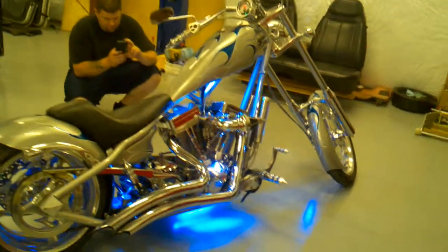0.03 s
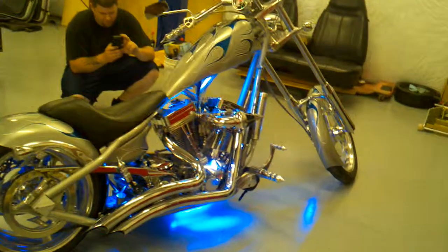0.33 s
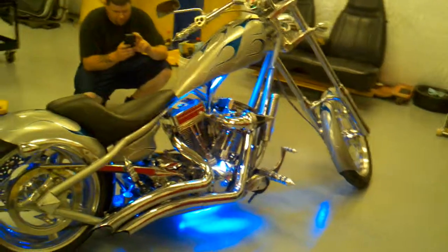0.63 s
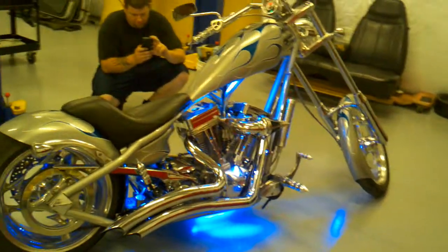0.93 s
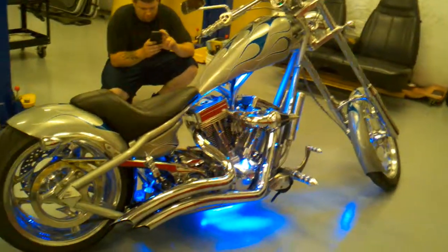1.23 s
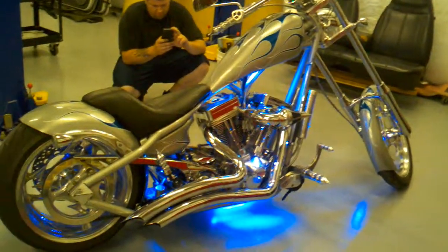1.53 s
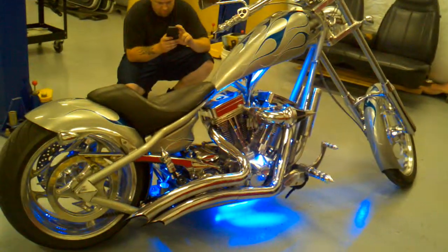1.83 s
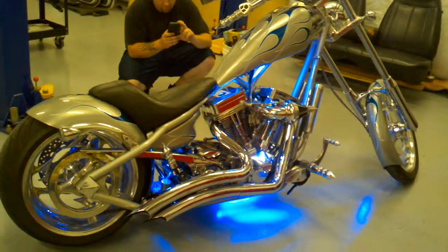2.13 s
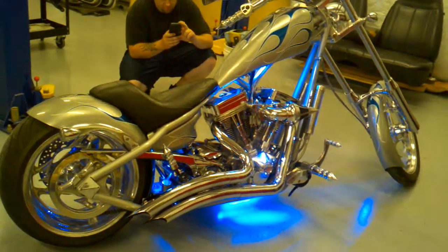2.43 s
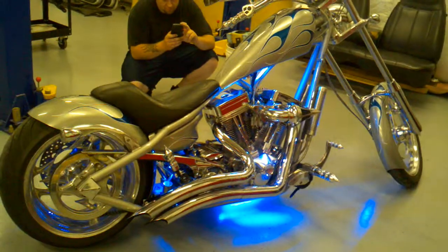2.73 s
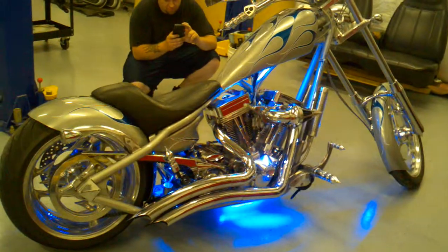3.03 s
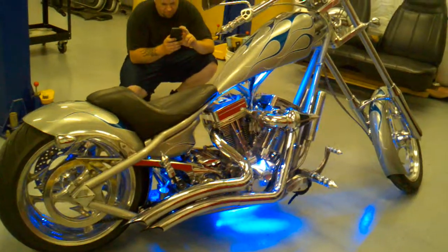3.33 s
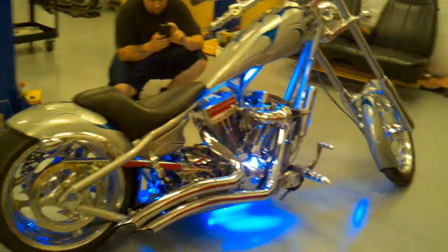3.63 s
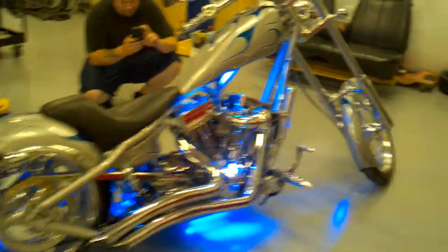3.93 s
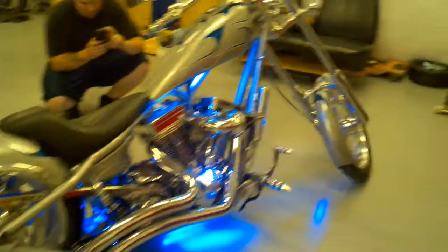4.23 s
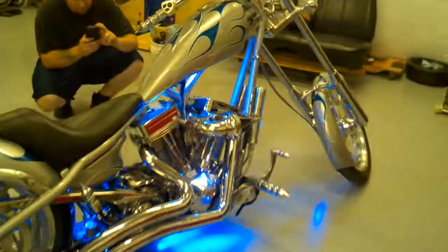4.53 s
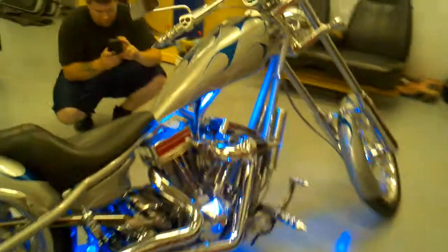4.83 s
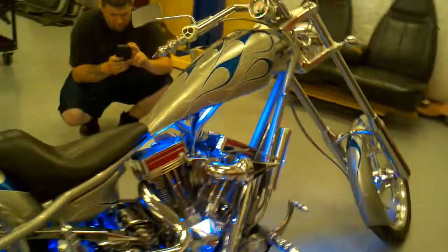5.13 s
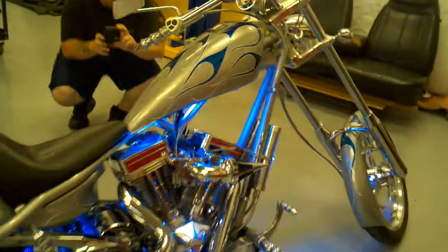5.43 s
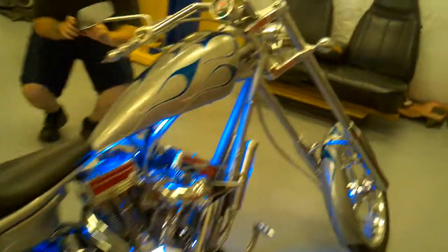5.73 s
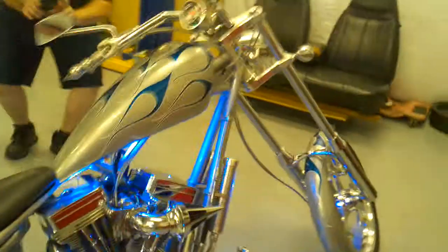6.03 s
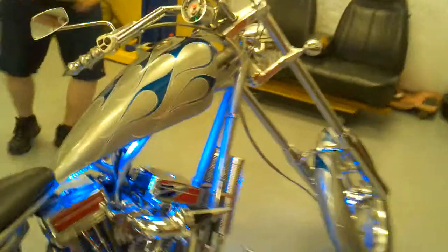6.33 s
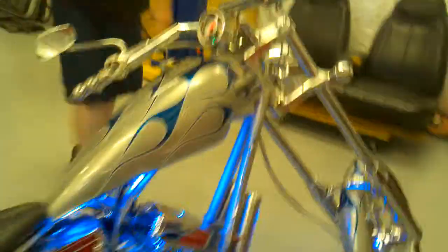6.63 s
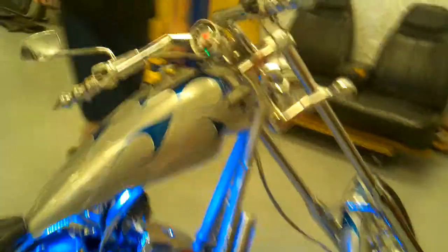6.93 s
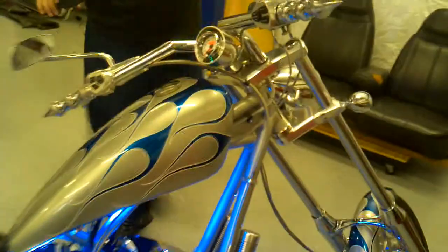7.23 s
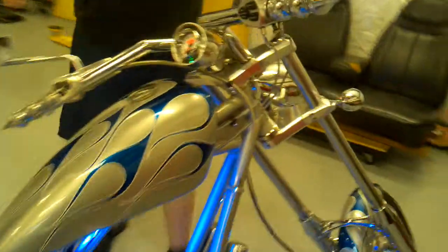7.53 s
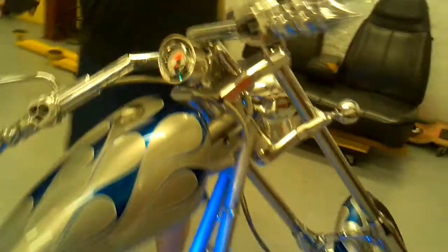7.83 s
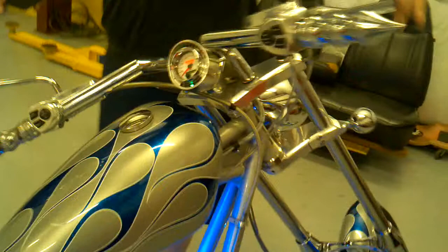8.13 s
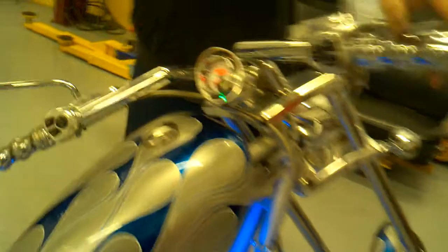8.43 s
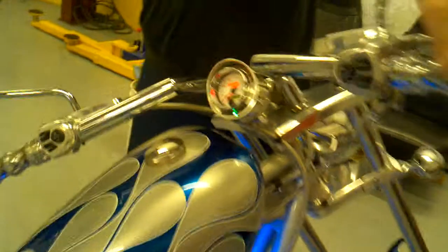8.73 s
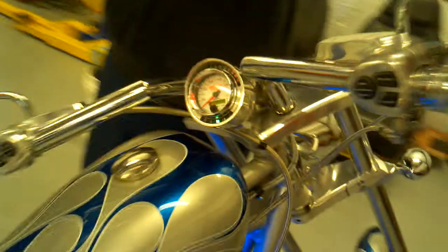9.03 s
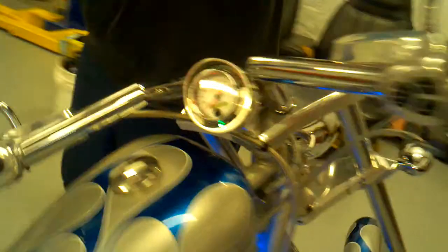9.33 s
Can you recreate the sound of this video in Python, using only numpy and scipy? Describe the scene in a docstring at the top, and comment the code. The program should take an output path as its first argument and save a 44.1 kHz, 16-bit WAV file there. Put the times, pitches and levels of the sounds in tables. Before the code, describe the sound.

A big motorcycle engine idles with uneven, loping exhaust pops and light metallic clatter in an echoing workshop.

```python
"""In a hard-walled workshop, a big V-twin motorcycle idles unevenly through short open pipes.
It pops one to three times in a row, then coasts and slows through weak, hissing strokes.
Each firing is a kick of pressure, a low thump and a rasping jet of gas that sometimes whistles;
a second thud follows about half a beat later. Metal rattles, the engine rumbles, the walls echo.
Two close microphones with stereo widening move from beside the pipes up to the fuel tank."""
import sys
import numpy as np
from scipy import signal
from scipy.fft import rfft, irfft, next_fast_len
from scipy.io import wavfile
from scipy.ndimage import map_coordinates

SR = 44100
rng = np.random.default_rng(int(sys.argv[2]) if len(sys.argv) > 2 else 0)


def generate_wav(signal):
    """Clip the signal to [-1, 1] and save it as 16-bit WAV at the path in sys.argv[1]."""
    frames = np.transpose(np.atleast_2d(signal))
    scaled = np.clip(frames, -1, 1) * 32767
    pcm = np.round(scaled).astype(np.int16)
    wavfile.write(sys.argv[1], SR, pcm)


N = 418950  # 9.5 seconds

# Strokes that fire fully and pop: t/s, pulse level/dB, rasp level/dB, hiss level/dB
LOUD_POPS = [(0.0292, -25.5, -15, -25), (0.122, -25.5, -12, -21), (0.3798, -27, -23.5, -27),
             (0.4635, -23.5, -14.5, -25.5), (0.6827, -28.5, -13, -26), (0.78, -29.5, -12.5, -21.5),
             (0.9688, -30.5, -15.5, -29), (1.045, -26.5, -14, -25.5), (1.1226, -27, -14, -24),
             (1.3711, -29, -20, -30.5), (1.454, -24, -13, -26), (1.8099, -27, -20, -33.5),
             (1.8715, -21.5, -11.5, -21.5), (2.088, -30, -21.5, -31.5), (2.2744, -29, -20, -32),
             (2.339, -22.5, -12.5, -24.5), (2.5693, -30.5, -16.5, -24), (2.6428, -29.5, -14, -24.5),
             (2.734, -34.5, -28, -39), (2.9228, -30.5, -21.5, -34), (3.09, -29.5, -14, -30),
             (3.1595, -27.5, -17.5, -27.5), (3.4423, -27, -14.5, -24.5), (3.5149, -28.5, -10.5, -22),
             (3.6973, -33.5, -19.5, -28.5), (3.7957, -26, -13, -26.5), (4.0486, -28, -26, -27.5),
             (4.1324, -23, -16, -22.5), (4.4877, -27, -18, -26.5), (4.5499, -23.5, -11.5, -23),
             (4.778, -29, -15, -24), (5.0349, -27, -26, -30.5), (5.1143, -24, -13, -23),
             (5.3385, -27.5, -9.5, -27.5), (5.438, -27, -14, -29), (5.6903, -26.5, -18.5, -34),
             (5.774, -20.5, -11, -28.5), (5.9967, -26.5, -10, -32), (6.0938, -26.5, -9.5, -27.5),
             (6.3661, -26.5, -19, -31.5), (6.4495, -21, -9, -24.5), (6.797, -27, -12.5, -34),
             (6.8606, -22.5, -9, -30), (7.0816, -28.5, -9.5, -32), (7.263, -29, -15, -40),
             (7.339, -24, -11, -31), (7.415, -25, -10.5, -25), (7.8004, -28, -24, -37),
             (7.8663, -20, -10, -21.5), (8.0994, -26, -15, -27.5), (8.3603, -25, -23, -34.5),
             (8.4412, -20, -17, -22.5), (8.7873, -26.5, -18.5, -34.5), (8.8489, -20.5, -12.5, -27.5),
             (9.0695, -25.5, -16, -30), (9.2418, -28.5, -19, -34), (9.307, -21, -15, -27.5)]
# Weak strokes while the engine coasts, each a short tick: t/s, hiss level/dB
COASTING_STROKES = [(0.191, -26.5), (0.295, -37), (0.525, -28), (0.611, -31), (1.192, -28.5), (1.291, -37),
                    (1.519, -26.5), (1.606, -29.5), (1.685, -33.5), (1.948, -35.5), (2.004, -27.5),
                    (2.167, -32.5), (2.42, -34.0), (2.478, -30.5), (2.814, -31), (3.247, -31.5),
                    (3.323, -28.5), (3.866, -30), (4.194, -27.5), (4.287, -33), (4.367, -31.5), (4.69, -32),
                    (5.265, -31), (5.513, -35.5), (5.612, -36), (5.837, -31.5), (5.929, -36.5),
                    (6.171, -39), (6.513, -34.5), (6.597, -38), (6.995, -33.5), (7.167, -41),
                    (7.481, -34.5), (7.579, -39.5), (7.943, -37.5), (8.01, -34.5), (8.278, -43),
                    (8.511, -35), (8.925, -38), (8.99, -34.5), (9.385, -36), (9.453, -38)]
WEAK_PULSE_DB, WEAK_RASP_DB, RASP_PER_HISS = -40, -17, 0.48

def firings():
    """Every stroke of the engine, loud or weak, in order: its time and its pulse, rasp and hiss levels."""
    weak = [(s, WEAK_PULSE_DB, WEAK_RASP_DB + RASP_PER_HISS * db, db) for s, db in COASTING_STROKES]
    return np.array(sorted([tuple(row) for row in LOUD_POPS] + weak)).T


# Tone of the pressure pulse, beside the pipes and over the tank: f/Hz, level/dB
PULSE_AT_PIPES = [(30, -62), (65, -18), (110, 4.5), (185, -6.5), (230, 3), (330, -2), (410, -4), (490, 3.5),
                  (620, -19), (850, -8.5), (1050, -3), (1400, -17), (2500, -29.5)]
PULSE_AT_TANK = [(44, -53), (65, -18.5), (105, 0), (180, -9.5), (240, -5.5), (360, 2), (440, -7.5),
                 (550, -1), (740, -4), (880, -16.5), (1100, -11), (1400, -12), (2500, -32)]
# Tone of the rasping gas at the same two spots: f/Hz, level/dB
RASP_AT_PIPES = [(400, -39.5), (1000, -6), (1350, -5), (1800, 6), (2300, -1.5), (3000, 2.5), (3600, 3),
                 (4300, -5), (7000, -18)]
RASP_AT_TANK = [(500, -16.5), (1050, -3.5), (1500, -17.5), (2100, 2), (2900, 4.5), (3500, -1.5),
                (4300, -18), (7000, -28)]
# Tone of the high hiss at the same two spots: f/Hz, level/dB
HISS_AT_PIPES = [(4000, -42.5), (5400, -3), (6400, 0), (7700, 1), (9200, -1), (10500, -14), (13800, -33)]
HISS_AT_TANK = [(3500, -1.5), (5400, 4), (7700, 0.5), (10500, -2.5), (13800, -10)]

def exhaust(over_tank):
    """A pressure pulse leaves the pipe just ahead of the gas. Rows: left, right, sound for the walls."""
    times, pulse_db, rasp_db, hiss_db = firings()
    pulses = scatter(times - .005, amp(pulse_db)[:, None] * pressure_waves(len(times)))
    rasp = amp(-4.0) * gas_jet(times, rasp_db, rise_s=0.0021, fall_s=0.0024, apart=1.77, linger=0.23)
    hiss = amp(2.0) * gas_jet(times, hiss_db, rise_s=0.0026, fall_s=0.0029, apart=1.0, linger=0.56)
    return (heard_from(over_tank, pulses, PULSE_AT_PIPES, PULSE_AT_TANK)
            + heard_from(over_tank, rasp, RASP_AT_PIPES, RASP_AT_TANK)
            + heard_from(over_tank, with_bounce(hiss), HISS_AT_PIPES, HISS_AT_TANK))


def pressure_waves(count, round_trip_s=0.002088, reflected=0.61):
    """A sharp wave bounces between valve and pipe end, faster in hotter gas, and leaves churning air."""
    t = event_time()
    trip = round_trip_s * np.exp(rng.normal(0, 0.14, (count, 1)))
    fronts = -sum((-reflected) ** k * np.exp(-((t - k * trip) / 0.000095) ** 2) for k in range(4))
    churn = (t > 0) * np.exp(-np.abs(t) / 0.012) * rng.standard_normal((count, len(t)))
    return amp(3.0) * fronts + amp(-5.5) * churn


def gas_jet(times, level_db, rise_s, fall_s, apart, linger):
    """Swirling gas bursts out as the valve opens; weak firings blow longer. Rows: left, right, walls."""
    t = event_time()
    stretch = np.exp(rng.normal(0, 0.41, (len(times), 1)))
    stretch *= amp(-linger * (level_db[:, None] - level_db.max()))
    width = np.where(t < 0, rise_s, fall_s * stretch)
    swell = amp(level_db)[:, None] * np.exp(-np.abs(t / width) ** 1.6)
    # the walls get one clean crack with the same energy and brightness as the burst
    crack = scatter(times, np.linalg.norm(swell, axis=1, keepdims=True))
    brighten = (np.sqrt(1 + 2 * apart ** 2) - 1) / 2
    to_walls = crack + brighten * np.diff(crack, prepend=0)
    return np.vstack([scatter(times, swell) * air_noise(apart), to_walls])


# Throaty blats on the hardest pops: t/s, middle f/Hz, level/dB
THROATY_BLATS = [(4.5495, 970, -21), (5.114, 1050, -28), (5.338, 1100, -23), (6.449, 1010, -25),
                 (6.8585, 790, -29), (7.414, 960, -29), (7.8648, 800, -15.5), (8.847, 950, -20.5),
                 (9.306, 1030, -16)]

def blats(width_s=0.0032, sweep_s=0.0052):
    """As hot gas fills the pipe, the pressure swings crowd together and the pitch shoots up."""
    times, hz, db = np.transpose(THROATY_BLATS)
    t = event_time()
    phase = 2 * np.pi * hz[:, None] * sweep_s * np.expm1(t / sweep_s)
    return scatter(times, swells(db, t, width_s) * np.cos(phase))


# Pops whose whistle stands out as a bark: t/s, f/Hz, level/dB
WHISTLING_BARKS = [(.122, 3160, -21), (.78, 3150, -17), (1.454, 1840, -13), (2.339, 2230, -13),
                   (2.644, 2210, -18), (3.515, 3410, -16.5), (4.05, 2190, -17.5), (4.55, 2260, -23),
                   (4.55, 2870, -14), (4.778, 2347, -15), (5.114, 3400, -14), (5.339, 2400, -33),
                   (5.438, 3320, -13.5), (5.774, 2180, -17), (6.095, 2340, -7.5), (6.861, 2480, -20),
                   (7.339, 3050, -8), (7.867, 3370, -17), (8.1, 1940, -9.5), (8.849, 3170, -11)]

def barks(width_s):
    """For a moment the jet locks on to one note of the pipe's lip; the shorter, the more like a clank."""
    times, hz, db = np.transpose(WHISTLING_BARKS)
    t = event_time()
    return scatter(times, swells(db, t, width_s) * np.sin(2 * np.pi * hz[:, None] * t))


# Strong thuds about half a crank turn after a stroke, probably the intake gulping: t/s, level/dB
STRONG_THUDS = [(0.079, -25), (0.732, -24), (1.084, -27), (1.169, -31), (1.238, -33), (1.416, -26.5),
                (1.494, -30), (1.907, -22.5), (2.377, -25), (2.783, -30), (2.972, -30), (3.042, -25),
                (3.201, -29.5), (3.559, -28.5), (3.75, -28), (3.845, -34), (4.585, -23.5), (5.391, -27),
                (5.481, -26.5), (6.047, -26.5), (6.894, -24), (7.378, -29), (7.454, -28), (7.517, -34),
                (7.904, -26.5), (8.481, -36), (8.887, -22), (9.116, -27), (9.193, -31.0), (9.345, -23),
                (9.426, -30.5)]
THUD_AT_PIPES_HZ, THUD_AT_TANK_HZ = 120.6, 103.8

def thuds(over_tank, width_s=0.0092, thump_delay_s=0.0019, soft_delay_s=0.043):
    """Short, round swings of air: a thump with every stroke, then a strong or soft thud before the next."""
    strokes, pulse_db, _, _ = firings()
    strong, strong_db = np.transpose(STRONG_THUDS)
    soft = np.flatnonzero(np.diff(np.searchsorted(strong, strokes)) == 0)  # no strong thud follows these
    soft_db = np.where(pulse_db[soft] > WEAK_PULSE_DB, -32, -38)  # louder after a pop
    times = np.r_[strokes + thump_delay_s, strong, strokes[soft] + soft_delay_s]
    db = np.r_[pulse_db - 7.5, strong_db, soft_db]
    place = np.interp(times, np.arange(N) / SR, over_tank)
    hz = THUD_AT_PIPES_HZ * (1 - place) + THUD_AT_TANK_HZ * place
    hz *= np.exp(0.027 * rng.standard_normal(len(times)))
    t = event_time()
    phase = 2 * np.pi * hz[:, None] * t
    swing = np.cos(phase) + amp(-11) * np.sin(2 * phase)
    return scatter(times, swells(db, t, width_s) * swing)


# Short low hums near 250 Hz that swell between some strokes: t/s, level/dB
LOW_HUMS = [(0.15, -37), (1.681, -35), (3.841, -41.5), (4.15, -35.5), (5.149, -40), (6.54, -33.5),
            (8.48, -36)]

def low_hum(pitch_hz=247.4, width_s=0.043):
    """A short low hum swells and fades, at a slightly different pitch each time."""
    times, db = np.transpose(LOW_HUMS)
    hz = pitch_hz * np.exp(0.027 * rng.standard_normal((len(times), 1)))
    t = event_time(size=8000)
    return scatter(times, swells(db, t, width_s) * np.sin(2 * np.pi * hz * t))


def clatter(level_db=-41, spread_db=4, pitch_hz=1550, ring_s=0.002, stray_knocks=400):
    """Valve gear and chain knock at random and twice at every stroke, each knock with its own pitch."""
    times = np.r_[rng.uniform(0, N / SR, stray_knocks), np.repeat(firings()[0], 2)]
    detune, strength = rng.standard_normal((len(times), 2)).T[:, :, None]
    t = np.maximum(event_time(size=600), 0)
    knocks = np.exp(-t / ring_s) * np.sin(2 * np.pi * pitch_hz * np.exp(.5 * detune) * t)
    return scatter(times, amp(level_db + spread_db * strength) * knocks)


# Tone of the engine's steady rumble: f/Hz, level/dB
RUMBLE_TONE = [(40, -51), (70, -8), (103, 4.5), (175, -21.5), (260, -3.5), (420, -3.5), (1300, -14),
               (2400, -19.5), (5200, -39.5), (7500, -31.5), (13800, -48.5)]

def rumble(close_db):
    """The engine rumbles on, grainy with valve chatter and throatier from close above."""
    chatter = map_coordinates(rng.standard_normal(N // 200 + 4), [np.arange(N) / 200], order=1)
    steady = amp(-44.0) * with_tone(air_noise(apart=5.8) * amp(4.05 * chatter), RUMBLE_TONE)
    return steady + amp(close_db) * with_tone(air_noise(apart=1.5), PULSE_AT_TANK)


def with_bounce(x, delay_s=0.0084, bounce_db=-11):
    """A hard surface nearby throws the sound back once; the path grows as the microphones move."""
    lag = (delay_s * SR * np.linspace(.85, 1.15, N)).astype(int)
    return x + amp(bounce_db) * x[:, np.clip(np.arange(N) - lag, 0, N - 1)]


# Tone of the workshop's echo: f/Hz, level/dB
ECHO_TONE = [(60, 7), (250, 0.5), (600, 1.5), (1200, -0.5), (2400, -5.5), (7000, -4), (13000, -6)]
# How long the echo takes to fade by 60 dB: f/Hz, t/s
ECHO_FADE = [(100, 1), (400, 0.76), (3000, 0.61), (8000, 0.74), (14000, 0.64)]

def wall_echo(size):
    """The walls' answer to one click: fading noise, left and right, alike in the bass."""
    hz, t, noise = signal.stft(rng.standard_normal((2, size)), SR, nperseg=256)
    fade_s = along(ECHO_FADE, hz)[:, None]
    tail = noise * amp(along(ECHO_TONE, hz)[:, None] - 60 * t / fade_s)
    tail *= np.sqrt(np.log(1e6) / (fade_s * SR))  # a longer fade adds no energy
    tail *= (1 - np.exp(-t / 0.00033)) * (1 + 0.83 * np.exp(-t / 0.02))  # near walls answer first
    alike = .95 * np.sinc(hz / 3000)[:, None]
    tail *= np.sqrt([(1 + alike) / 2, (1 - alike) / 2])
    mid, side = signal.istft(tail, nperseg=256)[1][:, :size]
    return np.array([mid + side, mid - side])


# The deep note that builds up between the walls: f/Hz, width/Hz, level/dB
STANDING_WAVES = [(103, 2.15, 10.5)]

def workshop(x, spots=16, size=26000):
    """The echo blends from spot to spot as the microphones move, and the room booms on one note."""
    echoes = np.zeros((2, N + size))
    hop = N // (spots - 1) + 1
    for k in range(spots):
        at = np.arange(max(0, (k - 1) * hop), min(N, (k + 1) * hop))
        blend = np.cos(np.pi / 2 * (at / hop - k))
        part = signal.fftconvolve((x[at] * blend)[None], wall_echo(size), axes=1)
        echoes[:, at[0]:at[0] + part.shape[1]] += part
    boom = filtered(x, lambda hz: sum(amp(db) * 1j * hz * width / (note ** 2 - hz ** 2 + 1j * hz * width)
                                      for note, width, db in STANDING_WAVES))
    return amp(-2.0) * echoes[:, :N] + out_of_step(boom)


def heard_from(over_tank, x, pipe_tone, tank_tone):
    """The tone changes as the microphones move from the pipes (0) to the tank (1)."""
    return np.sqrt(1 - over_tank) * with_tone(x, pipe_tone) + np.sqrt(over_tank) * with_tone(x, tank_tone)


def out_of_step(x, lead_ms=0.34):
    """A sound reaches the left microphone a moment before the right."""
    return filtered(x, lambda hz: np.exp(1j * np.pi * np.outer([1, -1], hz) * lead_ms / 1000))


def microphones(pair, bass_lead_ms, bass_tilt_db=0.56, split_hz=2400):
    """Sound reaches the left side first; the bass bends around the microphones' body and takes longer."""
    bass = filtered(pair, lambda hz: 1 / (1 + (hz / split_hz) ** 8))
    shift = bass_lead_ms * SR / 2000  # half the lead for each side, in samples
    bent = np.array([map_coordinates(channel, [np.arange(N) + sign * shift], order=1)
                     for channel, sign in zip(bass, (1, -1))])
    return amp([[-bass_tilt_db], [bass_tilt_db]]) * bent + out_of_step(pair - bass, lead_ms=0.1)


def air_noise(apart):
    """Noise at the two microphones: alike in the bass, less alike the higher it goes."""
    return rng.standard_normal(N) + apart * np.diff(rng.standard_normal((2, N + 1)))


def amp(db):
    """Turn decibels into a number to multiply by."""
    return 10 ** (np.asarray(db) / 20)


def along(points, hz):
    """Read between the rows of a (frequency, value) table, with octaves evenly spaced."""
    freqs, values = np.transpose(points)
    return np.interp(np.log(hz + 1), np.log(freqs), values)


def filtered(x, response):
    """Scale and delay each frequency in x as response(hz) says."""
    size = next_fast_len(N + SR // 2, True)
    return irfft(rfft(x, size) * response(np.fft.rfftfreq(size, 1 / SR)), size)[..., :N]


def with_tone(x, points, size=4096):
    """Give x the tone in a table, with a filter that leaves white noise equally strong."""
    gain = amp(along(points, np.fft.rfftfreq(size, 1 / SR)))
    gain /= np.sqrt(np.mean(gain ** 2))
    fold = np.r_[1, np.full(size // 2 - 1, 2), np.zeros(size // 2)]  # ring after a sound, never before
    ring = irfft(np.exp(rfft(irfft(np.log(gain)) * fold)))
    return signal.oaconvolve(np.atleast_2d(x), ring[None], axes=1)[:, :N]


def event_time(size=3000):
    """Seconds before and after the middle of a short sound."""
    return (np.arange(size) - size // 2) / SR


def swells(db, t, width_s):
    """One smooth rise and fall for each level."""
    return amp(db)[:, None] * np.exp(-(t / width_s) ** 2)


def scatter(times, shapes):
    """Add short sounds, one per row, into one track, each centred on its time."""
    size = shapes.shape[1]
    at = np.round(times * SR).astype(int)[:, None] + np.arange(size) - size // 2
    inside = (at >= 0) & (at < N)
    return np.bincount(at[inside], shapes[inside], N)


# The microphones' path: t/s, place (0 pipes, 1 tank), left side's bass lead/ms, close rumble level/dB
MICROPHONE_PATH = [(0, 0.14, 0.11, -64), (4, 0.25, 0.16, -78.5), (5.3, 0.74, 0.19, -83),
                   (6.5, 0.96, 0.21, -41.5), (7.7, 0.89, 0.22, -48), (8.6, 0.85, 0.2, -38.5),
                   (9.5, 0.86, 0.22, -33)]

def scene():
    """The engine and its echoes at the moving microphones; the barks reach the walls as short clanks."""
    times, *columns = np.transpose(MICROPHONE_PATH)
    over_tank, lead_ms, close_db = [np.interp(np.arange(N) / SR, times, column) for column in columns]
    pops = exhaust(over_tank)
    thud, blat, rattle = thuds(over_tank), blats(), clatter()
    direct = pops[:2] + blat + rattle + barks(width_s=0.0025) + out_of_step(thud) + low_hum()
    to_walls = pops[2] + 0.29 * thud + 0.3 * blat + 0.77 * barks(width_s=0.0012) + 0.5 * rattle
    return microphones(direct + workshop(to_walls) + rumble(close_db), lead_ms)


# How much of the other microphone is taken away from each side: f/Hz, share (0-1)
WIDENING = [(80, .6), (300, .8), (1300, .95), (2600, .97), (3800, .93), (7000, .65), (13000, .6)]
WIDENING_DELAY_S, LOW_CUT_HZ, HIGH_CUT_HZ = .000381, 50, 14100

def record(dry):
    """Widen the stereo by subtracting a late copy of the other side, then trim peaks, lows and highs."""
    share = lambda hz: np.clip(along(WIDENING, hz), 0, .97)
    turn = lambda hz: 2 * np.pi * hz * WIDENING_DELAY_S
    # win back the bass that the subtraction takes away
    restore = lambda hz: 1 / np.abs(1 - share(hz) * np.exp(-1j * np.minimum(turn(hz), np.pi / 2)))
    other_side = filtered(dry[::-1], lambda hz: restore(hz) * share(hz) * np.exp(-1j * turn(hz)))
    wide = np.clip(filtered(dry, restore) - other_side, -.85, .85)
    return filtered(wide, lambda hz: (hz < HIGH_CUT_HZ) * (1 - .8 / (1 + (hz / LOW_CUT_HZ) ** 6)))


dry = scene()
out = record(dry)
generate_wav(out)
```